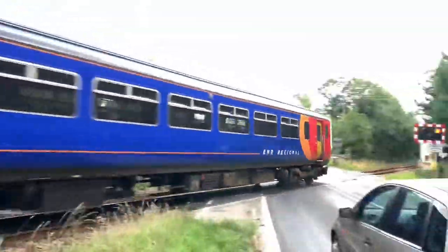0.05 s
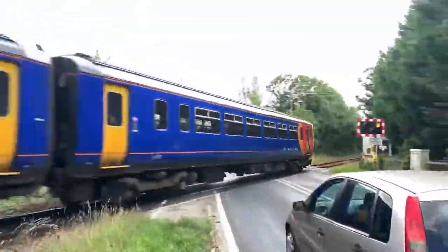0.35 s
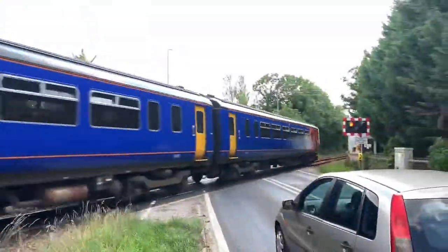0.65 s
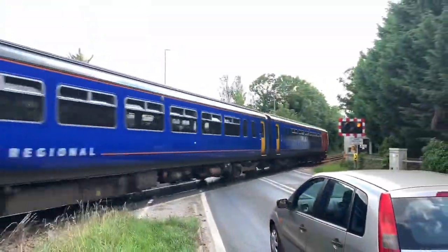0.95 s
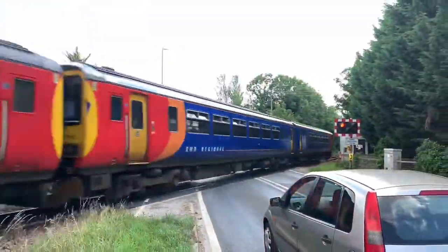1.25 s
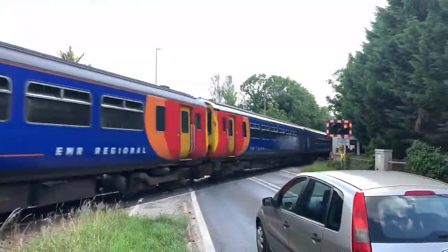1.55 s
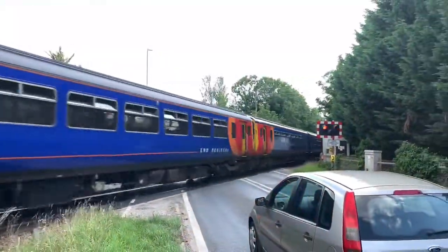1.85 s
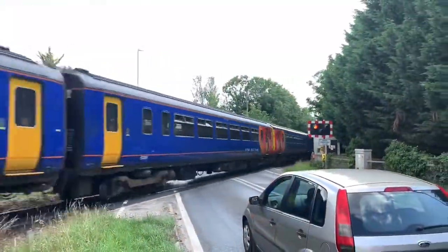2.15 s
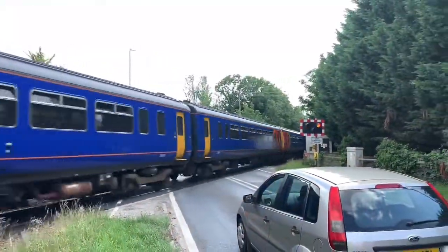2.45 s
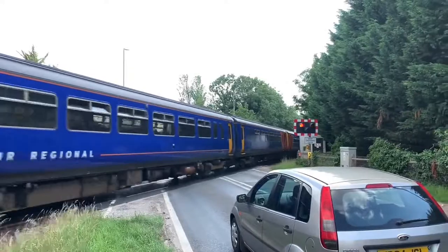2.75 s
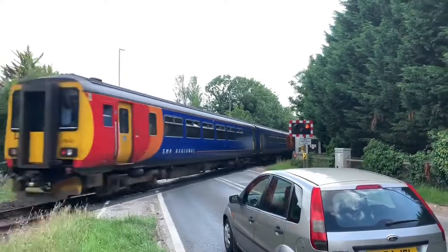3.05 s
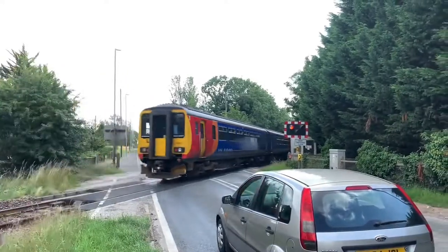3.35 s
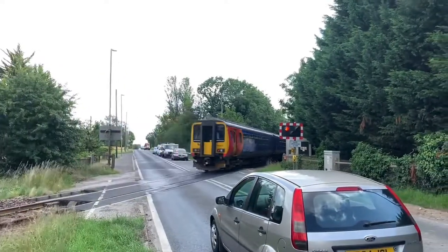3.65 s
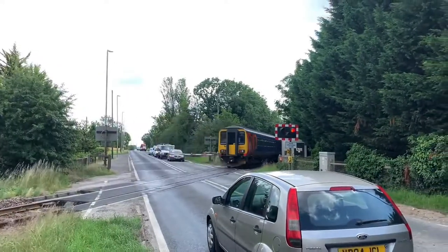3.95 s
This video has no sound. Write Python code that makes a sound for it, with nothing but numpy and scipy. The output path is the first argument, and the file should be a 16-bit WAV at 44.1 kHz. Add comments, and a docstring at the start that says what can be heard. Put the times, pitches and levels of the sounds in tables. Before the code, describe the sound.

A passenger train speeds past close by, wheels clattering and rumbling, then draws away.

```python
"""A train speeds past

A four-car diesel train runs over a road crossing at speed, a few metres from a phone, and draws away.
Each pair of axles hammers twice over a rail joint, with weaker knocks from joints further off.
The car bodies rumble, the rails roar, and the wheels ring and now and then squeak.
Engines under the floor and a turbo whistle sink in pitch as they go by."""
import sys
import numpy as np
from scipy import signal
from scipy.fft import rfft, irfft
from scipy.io import wavfile
from scipy.ndimage import uniform_filter1d, map_coordinates

SR = 44100
rng = np.random.default_rng(int(sys.argv[2]) if len(sys.argv) > 2 else 0)


def store_pcm(level_fs):
    """Save levels as 16-bit WAV."""
    pcm = np.round(np.clip(level_fs, -1, 1) * 32767).astype(np.int16)
    wavfile.write(sys.argv[1], SR, np.atleast_2d(pcm).T)


N = 176400

# The notes a steel wheel rings at: pitch_hz, width_hz, passing_db, leaving_db
WHEEL_NOTES = [(1577, 160, -1, -10), (2100, 90, 4, -25), (2282, 110, -1, -3.5), (2795, 260, 0, 0),
               (3500, 228, -1, -5.5), (4267, 320, -4, -5.5), (4940, 357, -12, -18), (5900, 650, -13.5, -13),
               (6650, 600, -17.5, -16)]


def undb(db):
    """Turn decibels into a number to multiply by."""
    return 10 ** (np.asarray(db) / 20)


def unit(x):
    """Scale a signal to an average power of 1."""
    return x / np.sqrt(np.mean(x ** 2) + 1e-18)


def over_hz(points):
    """Read rows of (pitch_hz, value) at every frequency."""
    hz, value = np.array(points, float).T
    return np.interp(np.log(np.fft.rfftfreq(N, 1 / SR) + 1e-9), np.log(hz), value)


def colour(points):
    """A filter shaped by rows of (pitch_hz, level_db) that rings only after it is struck."""
    cepstrum = irfft(np.log(undb(over_hz(points))), N)
    cepstrum[1:N // 2] *= 2
    cepstrum[N // 2 + 1:] = 0
    return np.exp(rfft(cepstrum))


def resonance(hz, width_hz):
    """A filter that rings at one pitch; the narrower it is, the longer it rings."""
    f = np.fft.rfftfreq(N, 1 / SR) + 1e-9
    return 1 / (1 + 1j * (f * f - hz * hz) / (f * width_hz))


def through(x, response):
    """Pass a sound through a filter."""
    return irfft(rfft(x) * response, N)


def wander(per_s):
    """A smooth random curve that strays about 1 either side of zero."""
    hold = int(SR / per_s)
    steps = np.repeat(rng.standard_normal(N // hold + 1), hold)
    return 1.3 * uniform_filter1d(uniform_filter1d(steps, hold), hold)[:N]


def flutter(phase, per_s):
    """Two versions of a tone, each trembling in level and pitch."""
    return np.array([wander(per_s) * np.sin(phase) + wander(per_s) * np.cos(phase) for _ in range(2)])


def passing(t, closest_s, speed_m_s=26, track_m=7.21):
    """Pitch and level factors for a point on the train: higher as it comes, louder when near."""
    along_m = speed_m_s * (t - closest_s)
    distance_m = np.hypot(along_m, track_m)
    return 1 / (1 + speed_m_s / 343 * along_m / distance_m), track_m / distance_m


def roughness(jolts_per_s=500, jolt_share=0.18):
    """The force between wheel and rail: fine steady roughness plus scattered small jolts."""
    jolts = (rng.random(N) < jolts_per_s / SR) * rng.standard_normal((2, N))
    return np.sqrt(1 - jolt_share) * rng.standard_normal((2, N)) + np.sqrt(jolt_share) * unit(jolts)


def rolling(t):
    """Rough wheels on rough rails make the bodies rumble, the rails roar, and a hiss above them."""
    # How the rolling swells and fades: time_s, rumble_db, roar_db, hiss_db
    loudness = [(0, -28.5, -24, -32.5), (.3, -30, -24, -33), (.6, -29.5, -24.5, -32.5),
                (.9, -30, -25.5, -34.5), (1.15, -29.5, -24.5, -34), (1.48, -33.5, -26, -34),
                (1.75, -30.5, -28, -35), (2.05, -30.5, -26, -34), (2.35, -32.5, -26.5, -33),
                (2.65, -32, -27.5, -34.5), (2.95, -37, -28, -34), (3.19, -49.5, -30.5, -36),
                (3.36, -37, -30.5, -37), (3.55, -45, -37, -39.5), (3.75, -47, -37.5, -41),
                (4.0, -49, -41, -43)]
    # The tone of the rumble and of the roar: pitch_hz, level_db
    rumble_tone = [(20, -41), (30, -26), (40, -13), (52, -6), (80, -3), (125, -5.5), (170, 1.5), (215, -3),
                   (250, -2), (320, 0), (500, -20), (1000, -58.5)]
    roar_tone = [(150, -14.5), (330, -8), (600, -2.5), (870, 1), (1050, -1.5), (1350, -9), (1800, -48),
                 (3500, -54.5)]
    # A hiss that thins towards the top treble, heard with a dip at 10 kHz: pitch_hz, level_db
    thinning_hiss = [(700, -11), (1600, 6), (2000, 2.5), (2500, -4.5), (3150, -7.5), (4500, -6.5),
                     (5400, -14), (6700, -12.5), (8800, -15), (10000, -37), (11300, -15), (14800, -28.5)]
    times, *levels = np.array(loudness).T
    rumble_db, roar_db, hiss_db = (np.interp(t, times, level) for level in levels)
    shaken = lambda tone: unit(through(roughness(), colour(tone))) * undb(1.1 * wander(per_s=35.11))
    rumble = shaken(rumble_tone) * undb(rumble_db + 2)
    roar = shaken(roar_tone) * undb(roar_db + 2.76)
    noise = rng.standard_normal((2, N)) + 0.15 * roughness()
    hiss = unit(through(noise, colour(thinning_hiss))) * undb(3 + 1.2 * wander(per_s=44.98))
    # The treble dulls as the last car leaves.
    leaving_s, treble_hz, loss_db_per_s = 2.34, 5093, 5.5
    dull = through(hiss, 1 / (1 + (np.fft.rfftfreq(N, 1 / SR) / treble_hz) ** 4))
    hiss = dull + (hiss - dull) * undb(-loss_db_per_s * np.maximum(t - leaving_s, 0))
    return rattle(rumble + roar) + (hiss + wheel_ring(t)) * undb(hiss_db)


def rattle(sound):
    """Parts of the bodies and rails rattle on their own, so each pitch band swells separately."""
    # The middle of each band: pitch_hz
    centres = [130, 200, 280, 400, 560, 750, 950, 1200]
    bands = (through(sound, over_hz(list(zip(centres, pick)))) for pick in np.eye(len(centres)))
    return sum(band * unit(undb(2.2 * wander(per_s=26))) for band in bands)


def wheel_ring(t, ping_share=0.55, pitch_drop=0.018):
    """The wheels sing and ping on the rough rail and go a little flat as the train leaves."""
    away = np.interp(t, [1.5, 3.3], [0, 1])  # 0 while passing, 1 when leaving
    force = roughness()
    ring = np.zeros((2, N))
    for hz, width_hz, passing_db, leaving_db in WHEEL_NOTES:
        singing = unit(through(force, resonance(hz, width_hz) ** 2))
        note = np.sqrt(1 - ping_share) * singing + np.sqrt(ping_share) * pings(hz, width_hz)
        ring += note * undb(passing_db + (leaving_db - passing_db) * away + 2.5 * wander(per_s=24))
    slowing_clock = np.cumsum(1 - pitch_drop * away)
    return np.array([map_coordinates(row, [slowing_clock], mode="mirror") for row in ring]) * undb(-2.5) / 2


def pings(hz, width_hz, per_s=70, ring_s=0.2):
    """Small jolts ring one wheel after another, each at a slightly different pitch."""
    t = np.arange(int(ring_s * SR)) / SR
    fade = undb(-60 * t / ring_s) * np.minimum(t / .004, 1)
    count = int(per_s * N / SR)
    out = np.zeros((2, N + len(t)))
    for k, (detune, strength, *offsets) in enumerate(rng.standard_normal((count, 4))):
        i = int((k + rng.random()) * N / count)
        cycles = (hz + 0.35 * width_hz * detune) * t + np.array(offsets)[:, None]
        out[:, i:i + len(t)] += undb(1.5 * strength) * fade * np.sin(2 * np.pi * cycles)
    return unit(out[:, :N])


def engines(t):
    """The exhaust drone of each car swells and sinks in pitch as it passes."""
    # One engine per car: closest_s, firing_hz, level_db
    cars = [(0.329, 77.76, -25), (1.15, 76.8, -42), (2.199, 81.65, -35.5), (3.451, 81.8, -40)]
    # The tones in the drone: multiple_of_firing_rate, level_db
    harmonics = [(1, -4), (2, -7.5), (3, -8.5)]
    out = np.zeros(N)
    for closest_s, firing_hz, level_db in cars:
        bend, nearness = passing(t, closest_s)
        pitch_hz = firing_hz * bend * (1 + 0.0044 * wander(per_s=18))
        phase = 2 * np.pi * np.cumsum(pitch_hz) / SR
        drone = sum(undb(db + 1.55 * wander(per_s=9)) * np.sin(round(k) * phase) for k, db in harmonics)
        out += undb(level_db) * nearness * drone
    return np.array([out, np.zeros(N)])  # all direct sound, none scattered


def rail_joints(attack_s=0.00077, release_s=0.0065, tail_s=0.03, contacts_per_s=1500):
    """Each wheel hammers over a joint in a burst of tiny contacts that rings track and wheel."""
    # Wheel blows (thud and clang are added to the level): start_s, level_db, thud_db, clang_db, length_s
    blows = [(0.019, -20.5, 3.5, -22, 0.01), (0.046, -14.5, -24, -20, 0.015), (0.117, -8, -0.5, -20, 0.026),
             (0.167, -17.5, -1, -4, 0.042), (0.219, -9.5, -3.5, -3, 0.017), (0.29, -12, -1.5, -11, 0.022),
             (0.346, -24, 1, -17, 0.023), (0.384, -8.5, -6.5, -9.5, 0.027), (0.424, -19, 9.5, -15, 0.011),
             (0.483, -8.5, -5.5, -1.5, 0.018), (0.655, -18.5, -22, 5.5, 0.017), (0.797, -14, -6, -12, 0.01),
             (0.893, -20, 3, 0, 0.024), (0.991, -9.5, -2.5, -4, 0.015), (1.018, -13.5, -15, -21, 0.014),
             (1.073, -8, -14, -9, 0.0033), (1.092, -11, -4.5, -4.5, 0.027), (1.168, -17, -12, -3, 0.023),
             (1.261, -10.5, -3.5, -14, 0.027), (1.299, -23, -2, 3.5, 0.014), (1.36, -11.5, 5.5, -3, 0.018),
             (1.544, -26, -30, 12, 0.013), (1.563, -24, -8, 4, 0.0038), (1.676, -12, -9, -24, 0.0085),
             (1.77, -16.5, -4, 2, 0.0084), (1.797, -19, -4, -10, 0.0075), (1.868, -10.5, -3, -9, 0.021),
             (1.896, -12.5, -4, -18, 0.0091), (1.939, -18.5, 3.5, -5, 0.016),
             (1.965, -10.5, -1, -14, 0.023), (2.037, -23.5, 6, 9.5, 0.013),
             (2.138, -13.5, -1.5, -8.5, 0.033), (2.235, -10.5, 3.5, -18, 0.012),
             (2.410, -32.5, -14, 12.5, 0.02), (2.543, -18, -4, 3, 0.021), (2.670, -17.5, -7, 0, 0.012),
             (2.743, -8.5, -10, -34, 0.01), (2.763, -16, -0.5, -13, 0.013), (2.842, -13, -3, -10, 0.032),
             (3.019, -37.5, 2.5, 18, 0.034), (3.271, -24.5, -22, -0.5, 0.033),
             (3.383, -21.5, -31, -6, 0.019)]
    # A dull knock with faint treble, heard with a dip at 10 kHz: pitch_hz, level_db
    dull_knock = [(60, -57), (170, -13), (260, -5), (370, 4.5), (520, 5.5), (720, 4.5), (1050, -1),
                  (1450, -12), (1850, -27), (2800, -25), (4500, -30.5), (8000, -38), (10000, -48),
                  (14000, -38)]
    # The notes of the rail's clang: pitch_hz, ring_s (time to fade by 60 dB), level_db
    rail_notes = [(827, 0.038, -2), (875, 0.24, 4.5), (943, 0.092, -7.5), (1109, 0.12, -3.5)]
    size = SR // 3
    t = np.arange(size) / SR
    soften = colour([(2660, 0), (10640, -20)])  # sleepers and stones round off the treble
    rail = sum(undb(db) * resonance(hz, np.log(1000) / np.pi / ring_s) for hz, ring_s, db in rail_notes)
    wheel = sum(undb(db) * resonance(hz, width_hz) for hz, width_hz, db, _ in WHEEL_NOTES)
    parts = [rfft(irfft(part, N)[:size]) for part in (colour(dull_knock), soften * rail, soften * wheel)]
    out = np.zeros((2, N + size))
    for start_s, level_db, thud_db, clang_db, length_s in blows:
        after = np.maximum(t - length_s, 0)
        fade = np.exp(-after / release_s) + undb(-19) * np.exp(-after / tail_s)
        shape = np.minimum(t / attack_s, 1) * fade
        i = int(start_s * SR)
        out[0, i:i + size] += thud(t, length_s) * undb(level_db + thud_db)
        for part, part_db in zip(parts, [0, clang_db, -18.5]):  # knock, rail, wheel
            touches = rng.random(size) < contacts_per_s / SR
            contacts = touches * np.sign(rng.standard_normal((2, size))) * shape
            contacts[0, int(attack_s * SR)] += 1.46  # the main strike
            ring = irfft(rfft(contacts) * part, size)
            ring = np.array([unit(row) for row in ring]) * np.sqrt(np.mean(shape ** 2))
            out[:, i:i + size] += ring * undb(level_db + part_db + 0.4) / 2
    return out[:, :N]


def thud(t, length_s, rise_s=0.0028):
    """The sleepers (beams under the rails) start to swing as the wheel hammers, then ring out."""
    # The sleepers' low notes: pitch_hz, ring_s (time to fade by 60 dB), level_db
    sleeper_notes = [(177, 0.043, -8), (390.2, .14, -3.5)]
    after = np.maximum(t - length_s, 0)
    ring = np.zeros(len(t))
    for hz, ring_s, db in sleeper_notes:
        detune, offset = rng.standard_normal(2)
        cycles = hz * (1 + 0.015 * detune) * t + offset
        ring += undb(db - 60 * after / ring_s) * np.sin(2 * np.pi * cycles)
    return ring * (1 - np.exp(-t / rise_s)) * undb(-3)


def squeaks(t):
    """The lip of a wheel touches the rail, and one rough note swells for a moment."""
    # Each touch: peak_s, pitch_hz, level_db, swell_s, flutters_per_s
    touches = [(0.07, 2060, -24, 0.025, 36), (0.69, 1560, -26, 0.032, 160), (1.117, 2736, -34.5, 0.035, 85),
               (1.102, 4290, -33, 0.014, 80), (1.096, 4790, -39, .016, 80), (1.521, 6930, -43, 0.069, 600),
               (1.983, 2880, -30, 0.015, 140), (2.858, 2250, -27, 0.0079, 200),
               (3.445, 2740, -42, 0.09, 250)]
    out = np.zeros((2, N))
    for peak_s, hz, db, swell_s, flutters_per_s in touches:
        swell = np.exp(-((t - peak_s) / swell_s) ** 2 / 2)
        out += undb(db) * swell * flutter(2 * np.pi * hz * t, flutters_per_s) / np.sqrt(2)
    return out


def turbo(t, whistle_hz=8470):
    """The turbo's thin, unsteady whistle glides down as its engine goes by."""
    # How the whistle swells and fades: time_s, level_db
    loudness = [(.4, -66), (.58, -48), (.72, -42), (.85, -54), (1, -51.5), (1.2, -64), (1.4, -110)]
    bend, _ = passing(t, closest_s=0.53)
    phase = 2 * np.pi * np.cumsum(whistle_hz * bend) / SR
    return flutter(phase, per_s=520) * undb(np.interp(t, *np.array(loudness).T))


def microphones(pair):
    """Mix two signals, as direct and scattered sound, into two closely spaced microphones."""
    # How alike left and right are: pitch_hz, likeness (0 to 1)
    likeness = [(60, .98), (300, .965), (600, .85), (1000, .7), (1500, .65), (2000, .15), (5000, .25),
                (8000, .7), (12000, .92)]
    # How much later the right side hears the train: pitch_hz, delay_s
    right_delay = [(350, .00003), (700, .00014), (1000, .00024), (1700, .00021), (2500, .00019),
                   (6500, .000165), (10000, .000158), (14000, .000146)]
    alike = np.clip(over_hz(likeness), 0, .999)
    direct, scattered = rfft(pair)
    mid, side = direct * np.sqrt((1 + alike) / 2), scattered * np.sqrt((1 - alike) / 2)
    half_delay = np.exp(-1j * np.pi * np.fft.rfftfreq(N, 1 / SR) * over_hz(right_delay))
    return irfft(np.array([(mid + side) / half_delay, (mid - side) * half_delay]), N)


def scene():
    """All the sounds of the train together, in stereo."""
    # The train draws away to the right: time_s, left_minus_right_db
    balance = [(0, .3), (2.7, 0), (3.2, -1.9), (4, -2.2)]
    t = np.arange(N) / SR
    balance_db = np.interp(t, *np.array(balance).T)
    end_fades = np.clip(np.minimum(t, t[-1] - t) / 0.004, 0, 1)
    train = rail_joints() + rolling(t) + squeaks(t) + engines(t) + turbo(t)
    return microphones(end_fades * train) * undb(np.array([balance_db, -balance_db]) / 2)


def record(dry, low_cut_hz=27, high_cut_hz=15100):
    """The phone cuts the deepest bass and the highest treble."""
    dry = signal.sosfilt(signal.butter(4, low_cut_hz, "high", fs=SR, output="sos"), dry)
    return signal.sosfilt(signal.ellip(8, .2, 70, high_cut_hz, fs=SR, output="sos"), dry)


dry = scene()
out = record(dry)
store_pcm(out)
```